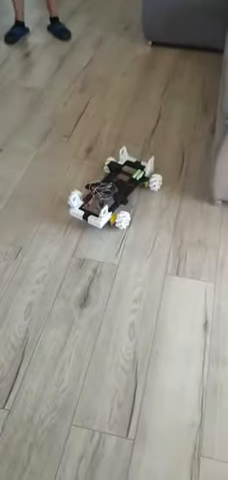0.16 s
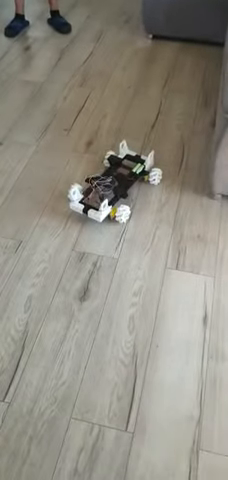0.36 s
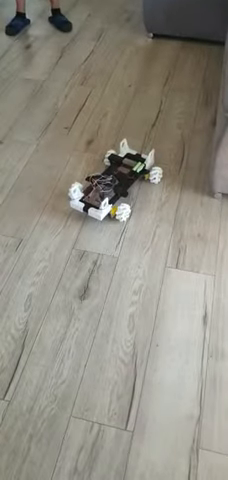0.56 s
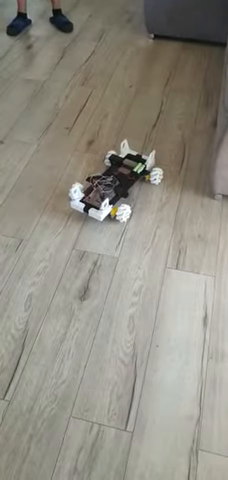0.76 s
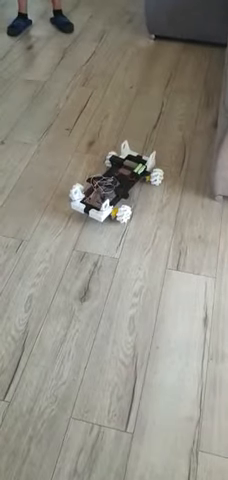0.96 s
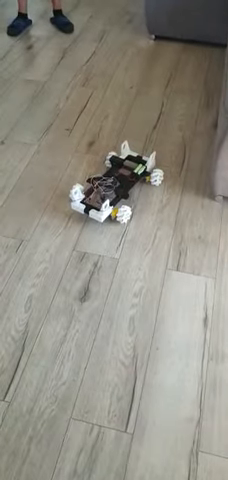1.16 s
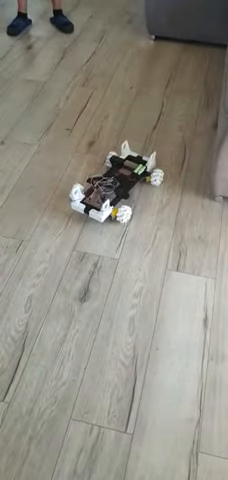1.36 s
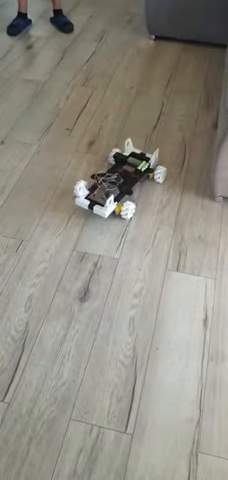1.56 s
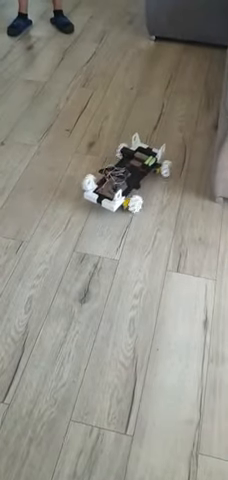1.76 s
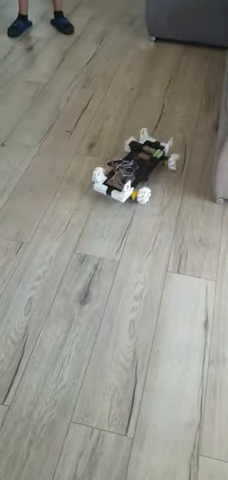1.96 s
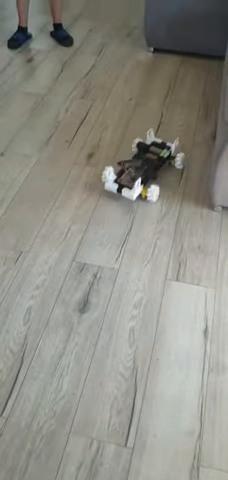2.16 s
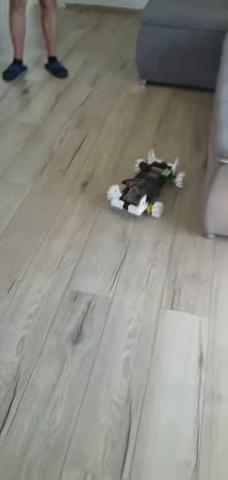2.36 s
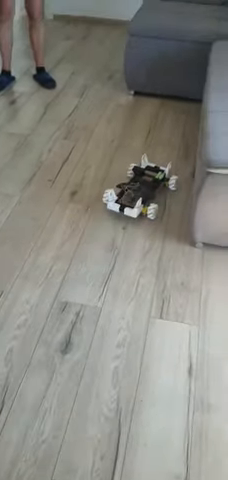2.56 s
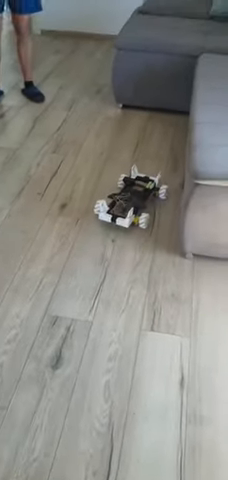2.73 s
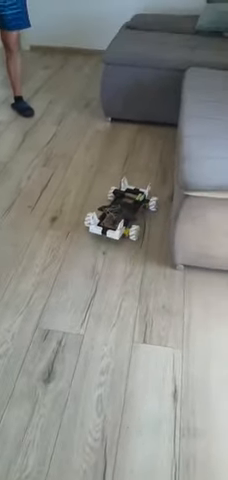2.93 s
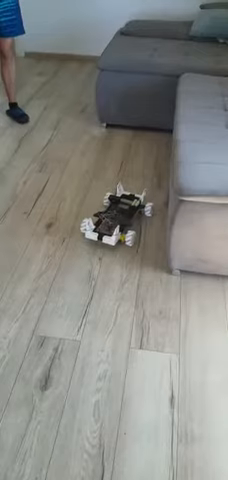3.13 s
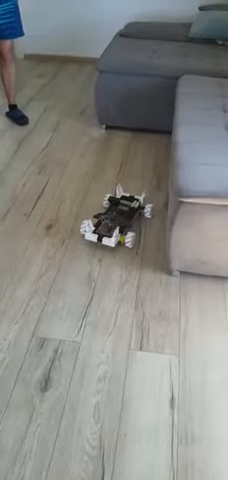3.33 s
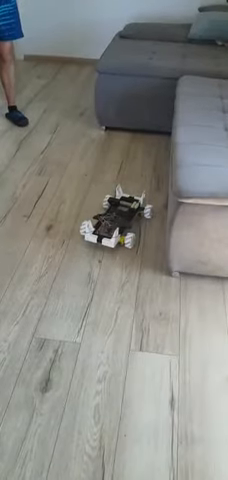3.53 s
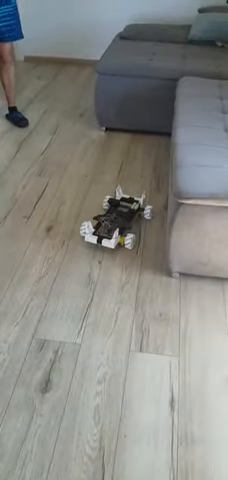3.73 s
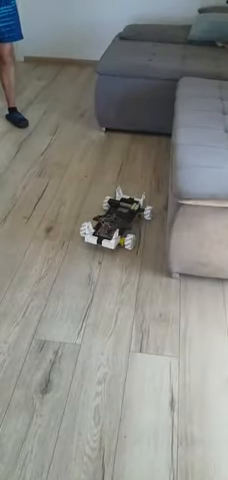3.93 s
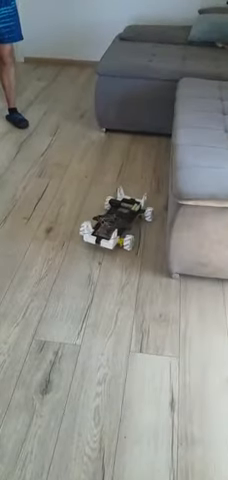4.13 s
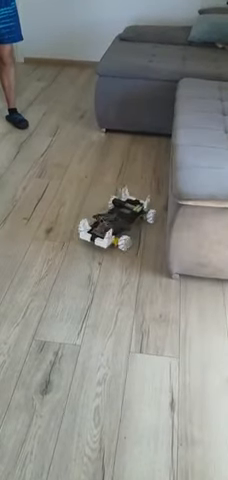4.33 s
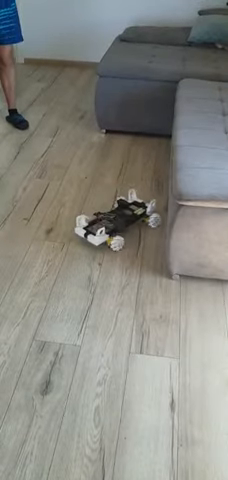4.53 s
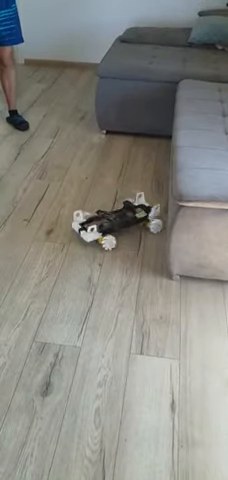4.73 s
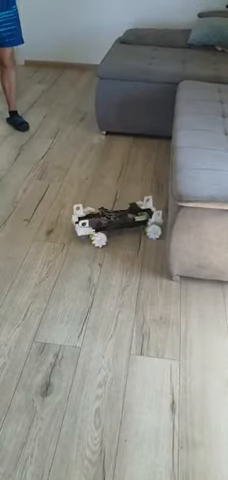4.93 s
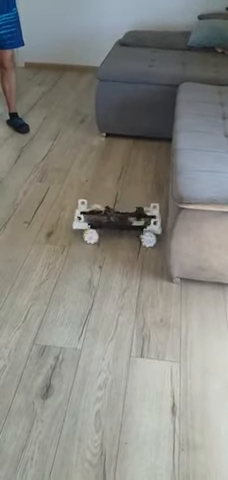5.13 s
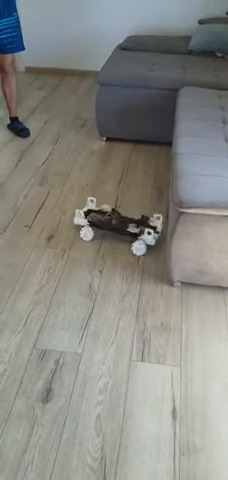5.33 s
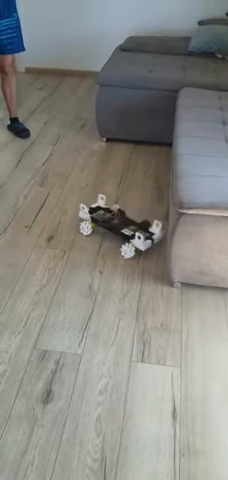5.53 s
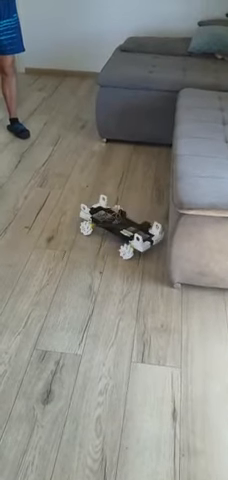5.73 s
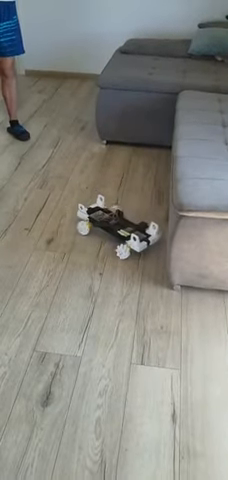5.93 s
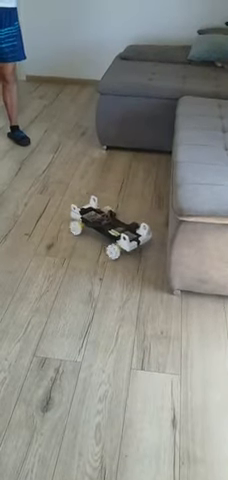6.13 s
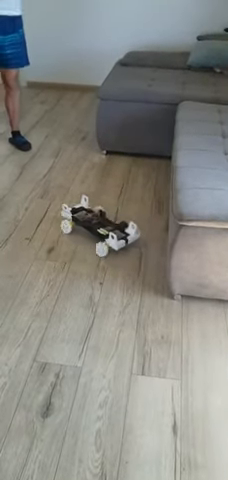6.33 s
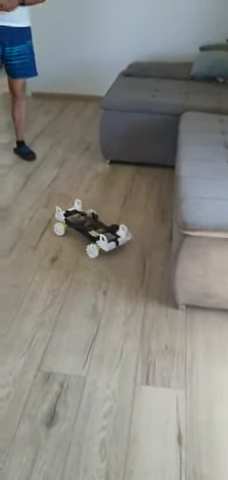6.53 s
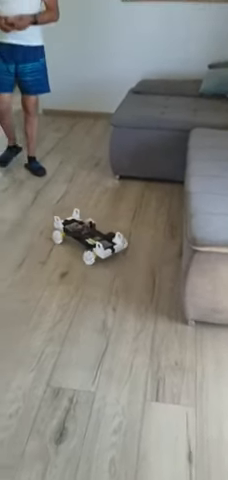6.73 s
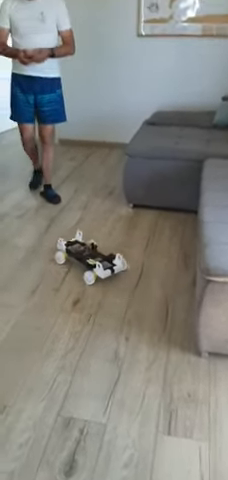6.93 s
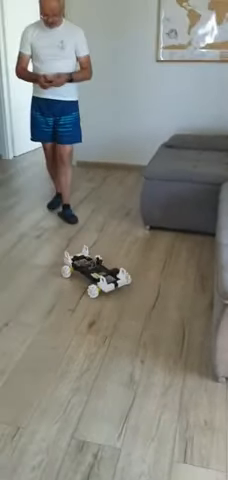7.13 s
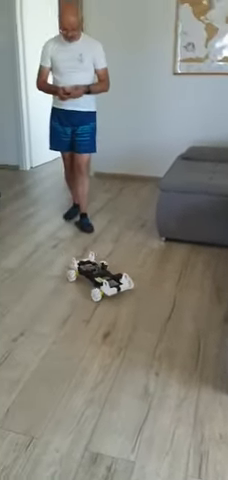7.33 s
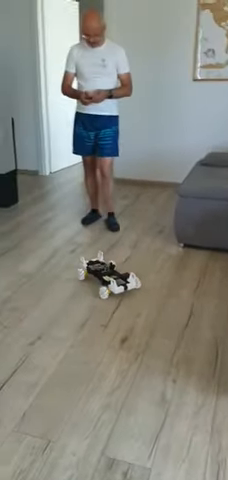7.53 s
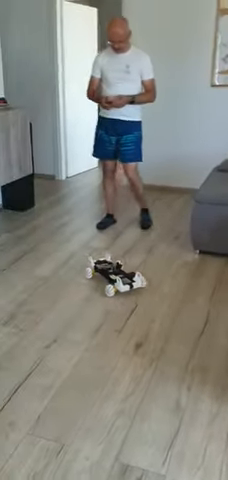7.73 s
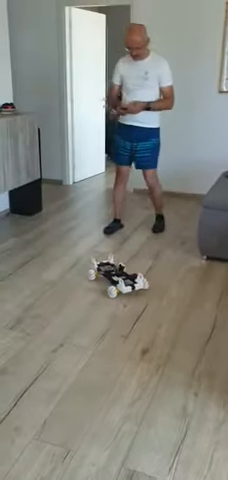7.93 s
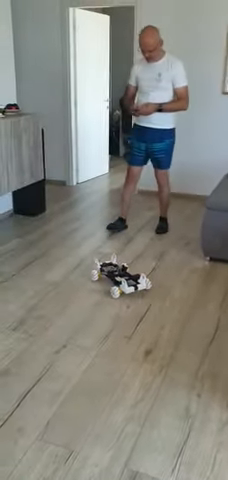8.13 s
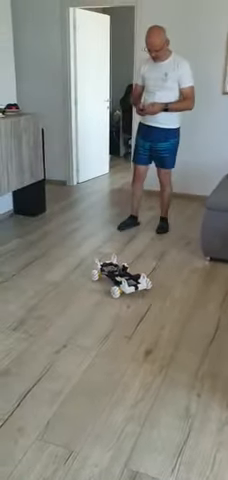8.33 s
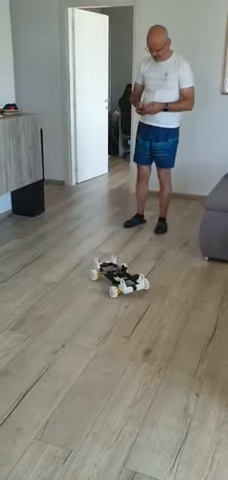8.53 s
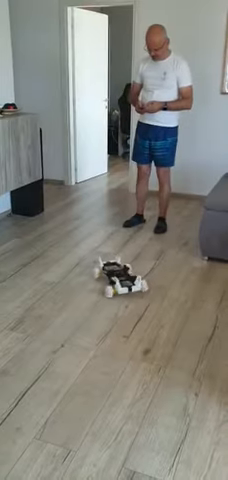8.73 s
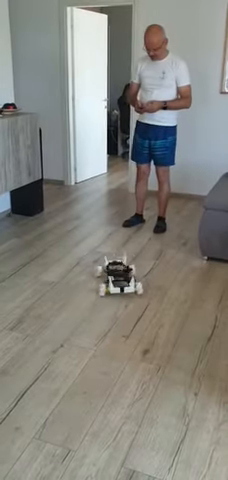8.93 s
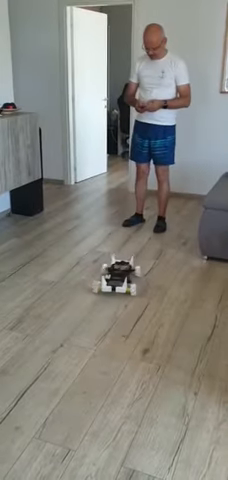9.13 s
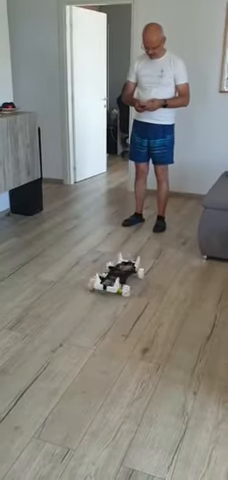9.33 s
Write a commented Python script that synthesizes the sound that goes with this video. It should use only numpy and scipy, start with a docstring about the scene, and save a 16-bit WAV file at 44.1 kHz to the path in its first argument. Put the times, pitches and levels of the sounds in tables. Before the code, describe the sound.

A small remote-controlled car drives across a laminate floor in a living room, in several short runs with brief pauses. Its electric motors whir and its plastic gears chatter brightly, while the wheels rattle, click and knock on the boards. Later the floor drums more hollowly beneath it. A slipper slides once before the last run. The car is heard from a couple of metres away, with clear room reflections and a faint low rumble.

```python
"""A small four-motor radio-controlled car drives, coasts and stops on a living room's laminate floor.
In each run the motors take up the gear play, spin up, hold speed and coast down. Tooth impacts make the
plastic gearboxes chatter, the motors whirr, and the wheels' rollers rattle on their pins and knock on
the boards, exciting the cavity below. A slipper slides once over the low rumble of the house.
At a couple of metres, much of the car's sound arrives by reflection from the walls."""
import sys
import numpy as np
from scipy import signal
from scipy.fft import rfft, irfft, next_fast_len
from scipy.io import wavfile
from scipy.ndimage import map_coordinates

SR = 44100
rng = np.random.default_rng(int(sys.argv[2]) if len(sys.argv) > 2 else 0)


def store_pcm(level_fs):
    """Save levels as 16-bit WAV."""
    pcm = np.round(np.clip(level_fs, -1, 1) * 32767).astype(np.int16)
    wavfile.write(sys.argv[1], SR, np.atleast_2d(pcm).T)


N = 418068

# Runs of the car: (power on [s], wheels roll [s], power off [s], standstill [s],
# creep relative to full drive [dB], full drive [dB], coasting loss [dB/s])
CAR_RUNS = [(-1, -.9, -.47, .08, -13, 0, 90), (1.345, 1.42, 2.325, 2.8, -12, -.6, 90),
            (4.02, 4.098, 5.43, 5.72, -12.5, .8, 118), (5.77, 5.83, 7.645, 8.07, -18, 2.3, 70),
            (8.44, 8.485, 9.5, 10, -22, .1, 90)]
# Brief swells and dips of the gear chatter and motor whirr:
# (start [s], duration [s], gain of gears and loose parts [dB], motor gain [dB])
SWELLS = [(-.15, .35, 9, -3), (1.86, .2, 5.5, 2), (2.68, .28, 10, 11), (4.3, .07, -3.5, -1),
          (4.38, .13, 1.5, 0), (4.78, .1, -3, 1.5), (5.13, .15, 1, 3.5), (5.55, .22, -2, -4.5),
          (5.88, .07, -5, -3), (5.96, .24, -4.5, -3), (6.22, .16, 2.5, 1), (6.43, .1, 2.5, 0),
          (6.54, .09, -3, -2), (7.0, .07, 1, 3.5), (7.155, .115, 4.5, 1), (7.64, .32, -4, 6.5),
          (7.95, .16, 3, 2), (8.43, .08, 0, 3), (8.99, .15, -6, -1)]
# Floor response along each run: (time [s], relative levels of patter [dB], drumming [dB], boom [dB])
FLOOR_RESPONSE = [
    [(1.4, -41, -51, -61), (1.95, -37.5, -47.5, -51), (2.1, -42.5, -52, -53), (2.3, -35.5, -52, -50),
     (2.5, -42, -54, -54)],
    [(4.04, -45, -56, -58), (4.15, -38.5, -50, -48), (4.45, -40, -48, -50), (5.0, -38, -50, -51),
     (5.18, -45, -53, -53), (5.35, -35, -44, -49), (5.65, -45, -55, -53)],
    [(6.05, -43, -53, -55), (6.33, -35.5, -50, -48), (6.5, -42, -48, -55), (6.95, -41, -45.5, -51),
     (7.2, -38, -36.5, -46), (7.45, -36, -35.5, -47), (7.65, -41, -38, -48), (7.9, -35.5, -38.5, -50)],
    [(8.55, -40, -43, -55), (8.75, -37.5, -40.5, -52), (9.0, -43, -40.5, -53), (9.2, -38, -41, -54),
     (9.48, -43, -42, -54)],
]
# A wheel drops from roller to roller in even trains:
# (start [s], level [dB], knocks [count], interval [s], change per knock [dB])
KNOCK_TRAINS = [(1.348, -58, 1, 0, 0), (1.442, -50.5, 2, .074, 4.5), (1.671, -46.5, 2, .024, 1),
                (1.851, -42, 1, 0, 0), (2.014, -48.5, 1, 0, 0), (2.153, -45, 2, .054, -4),
                (2.26, -45.5, 2, .055, .5), (4.109, -48, 5, .08, .5), (4.555, -52, 3, .053, 1.5),
                (4.867, -46.5, 2, .069, -1.5), (5.229, -48, 2, .024, 0), (5.864, -53, 2, .08, 6),
                (6.246, -44.5, 3, .054, -1), (6.623, -43, 4, .051, -2.5), (7.018, -45, 2, .053, -3),
                (8.496, -56, 1, 0, 0), (8.578, -47.5, 4, .079, 1.3), (8.917, -47.5, 4, .076, -.3),
                (9.269, -45, 1, 0, 0)]
# Gear play is taken up, or a loose roller snaps over: (time [s], level [dB])
PLASTIC_CLACKS = [(1.3488, -63), (1.4424, -51), (1.517, -41.5), (1.6708, -39), (1.7475, -48), (4.0228, -61),
                  (4.1066, -48.5), (4.203, -45), (4.4937, -42.5), (4.8717, -44), (4.9358, -44),
                  (5.0618, -37.5), (5.3645, -43), (5.4172, -45), (5.7693, -70), (5.8671, -48),
                  (5.945, -44.5), (6.2016, -44), (6.3036, -40), (6.4113, -44), (6.6252, -37.5),
                  (6.7713, -43), (7.1663, -38.5), (8.6573, -45.5), (8.9203, -41.5), (8.985, -46),
                  (9.22, -44)]
# Background of the house: (time [s], hiss level [dB], rumble level [dB])
HOUSE_LEVELS = [
    [(0, -67.5, -57), (1.3, -70.5, -58.5), (9.48, -73, -60)],
]
# Slide of the slipper: (time [s], level [dB])
SLIPPER_LEVELS = [
    [(8.0, -85), (8.14, -71), (8.22, -59.5), (8.31, -60), (8.335, -52.5), (8.46, -52.5), (8.52, -77)],
]

# Spectral envelopes of the sources: (frequency [Hz], relative level [dB])
GEARBOX_SPECTRUM = [(300, -44), (1200, -21.5), (2000, -13), (2900, -10), (4000, -7), (5350, -3.5),
                    (5800, 4), (6200, -2.5), (6700, -2.5), (7400, -6.5), (9500, -11.5), (11000, -16),
                    (12000, -14.5), (14000, -17.5), (15500, -42)]
MOTOR_SPECTRUM = [(150, -41.5), (700, -30), (1250, -15), (2000, -5.5), (2400, -3.5), (2750, 1),
                  (3100, -1.5), (3700, -7), (5000, -12.5), (5900, -4), (7000, -12.5), (9000, -29.5),
                  (15000, -45)]
PLASTIC_SPECTRUM = [(300, -40), (1200, -10.5), (2500, -3.5), (4000, -4), (5200, -4), (6200, 3),
                    (7400, -2.5), (10000, -11.5), (14000, -17), (15500, -33.5)]
BOARD_SPECTRUM = [(60, -41), (180, -21.5), (300, -20), (420, -9.5), (640, 1.5), (880, -1), (1200, -14),
                  (1800, -14), (4000, -32.5), (12000, -52)]
CAVITY_SPECTRUM = [(100, -41), (250, -16), (330, -8.5), (420, 0.5), (540, -6), (900, -37), (3000, -60.5)]
BOOM_SPECTRUM = [(50, -22.5), (120, -7.5), (195, 1), (270, -1.5), (400, -16.5), (1500, -54.5)]
RUMBLE_SPECTRUM = [(15, -36.5), (28, -18.5), (45, 0), (62, -3.5), (80, -3), (100, 0), (130, -6),
                   (180, -12.5), (260, -19.5), (500, -35), (2000, -79.5)]
HISS_SPECTRUM = [(40, -16.5), (250, 0.5), (420, -2.5), (700, -0.5), (920, -0.5), (1000, 2), (1100, -1),
                 (1400, -4.5), (2500, -16.5), (6000, -23.5), (8500, -30.5), (11500, -22), (14500, -22.5),
                 (15500, -33)]
ROLLER_SPECTRUM = [(60, -38.5), (200, -21), (400, -6), (650, 1), (900, -2.5), (1250, -10), (1800, -13),
                   (4000, -17), (12000, -49)]
SOLE_SPECTRUM = [(200, -6), (500, -6), (800, 2), (1100, -4), (2500, 1.5), (5500, -2), (8500, -4),
                 (13000, -9.5), (15500, -13.5)]

# Reverberation of the room: (frequency [Hz], time to decay by 60 dB [s])
ROOM_T60 = [(100, 0.82), (500, 0.66), (2500, .62), (6000, 0.4), (9000, .34), (14000, .22)]
# Similarity of the diffuse field at left and right: (frequency [Hz], coherence [ratio])
COHERENCE = [(100, 0.94), (290, 1), (640, 0.18), (1400, 0.13), (15000, 0.076)]
# Imbalance of the two microphone ports: (frequency [Hz], left minus right [dB])
PORT_BALANCE = [(100, 4.5), (200, 5.5), (380, 0), (700, 6.5), (1300, 1), (2400, 1.5), (15000, 1)]

TOP_HZ = 15700  # upper band limit
TIME = np.arange(N) / SR


def amp(db):
    """Amplitude ratio of a level in decibels."""
    return 10 ** (np.asarray(db) / 20)


def unit_rms(x):
    """Normalisation to unit mean power."""
    return x / np.sqrt(np.mean(x ** 2) + 1e-20)


def decay(t, t60):
    """Exponential damping by 60 dB in t60 seconds."""
    return np.exp(-np.log(1000) * t / t60)


def at_frequency(points, hz):
    """Interpolation of (frequency, value) points on a logarithmic frequency axis."""
    knots_hz, values = np.transpose(points)
    return np.interp(np.log(hz + 1), np.log(knots_hz + 1), values)


def envelope(tables, column):
    """Amplitude envelope interpolated in decibels, silent outside each table's span."""
    return sum(amp(np.interp(TIME, rows[:, 0], rows[:, column], -np.inf, -np.inf))
               for rows in map(np.array, tables))


def wobble(knots_per_s):
    """Smooth random modulation: a spline through Gaussian values."""
    return map_coordinates(rng.standard_normal(4096), [TIME * knots_per_s], mode="wrap")


def coloured(x, spectrum):
    """Minimum-phase filtering: folding the cepstrum gives a causal response with this spectrum."""
    size = 2 * next_fast_len(N // 2 + SR // 4)
    gain = amp(at_frequency(spectrum, np.fft.rfftfreq(size, 1 / SR)))
    cepstrum = irfft(np.log(gain))
    cepstrum[1:size // 2] *= 2
    cepstrum[size // 2 + 1:] = 0
    return irfft(rfft(x, size) * np.exp(rfft(cepstrum)), size)[..., :N]


def diffuse(size):
    """Stereo noise of a diffuse field: coherent in the bass, nearly independent in the treble."""
    coherence = at_frequency(COHERENCE, np.fft.rfftfreq(size, 1 / SR))
    angle = np.arccos(np.clip(coherence, -1, 1)) / 2
    white = rfft(rng.standard_normal((2, size)))
    mid, side = irfft(white * [np.cos(angle), np.sin(angle)], size)
    return np.array([mid + side, mid - side])


def impacts(rate_hz, jitter, spread_db):
    """Quasi-periodic impulses of uneven size; jitter is a fraction of the period."""
    at = np.flatnonzero(np.diff(np.floor(np.cumsum(rate_hz) / SR)))
    late, size = rng.standard_normal((len(at), 2)).T
    at = np.clip(at + jitter * late * SR / rate_hz[at], 0, N - 1).astype(int)
    return np.bincount(at, amp(spread_db * np.clip(size, -2, 2)), N)


def scattered(impulses, t60, grind_db):
    """Scattering by floor and furniture smears each impulse into a noise burst, over a steady grind."""
    power = signal.lfilter([1], [1, -decay(1 / SR, t60) ** 2], impulses ** 2)
    return unit_rms(np.sqrt(power / power.mean() + amp(grind_db) ** 2) * diffuse(N))


def car_drive(switch_s=.015, spin_up_s=.068, halt_s=.04):
    """First-order lags: the car creeps, spins up to a drive of about 1, coasts and halts."""
    since = lambda s: np.maximum(TIME - s, 0)
    drive = np.zeros(N)
    for on, roll, off, rest, creep_db, full_db, loss_db_per_s in CAR_RUNS:
        switched = 1 - np.exp(-since(on) / switch_s)
        spun_up = 1 - (1 - amp(creep_db)) * np.exp(-since(roll) / spin_up_s)
        hold_and_coast = amp(full_db - loss_db_per_s * since(off))
        drive += switched * spun_up * hold_and_coast * np.exp(-since(rest) / halt_s)
    return drive


def swell_gain(column, judder_db=.6):
    """Amplitude modulation: brief swells and dips, and a random judder as the rollers grip and slip."""
    arches_db = sum(row[column] * np.sin(np.pi * np.clip((TIME - row[0]) / row[1], 0, 1))
                    for row in SWELLS)
    return amp(arches_db + judder_db * wobble(22))


def jolt_gain(drops, surge_db=1.1, peak_s=.016):
    """Transient modulation: each roller drop jolts the gears into a brief surge."""
    impulses = np.bincount([round(s * SR) for s, db in drops], minlength=N)[:N]
    age = np.arange(SR // 4) / SR / peak_s
    return amp(surge_db * signal.fftconvolve(impulses, age * np.exp(1 - age))[:N])


def gear_chatter(drive, tooth_hz=190, flutter_db=.8, dull_hz=7200):
    """Tooth impacts in four unsynchronised gearboxes: faster, louder and brighter under drive."""
    speed = np.clip(drive / drive.max(), .01, 1) ** .2
    teeth = sum(impacts(tooth_hz * speed * amp(1.2 * wobble(7)), jitter=.2, spread_db=3)
                * amp(2.04 * wobble(25)) for gearbox in range(4))
    bright = coloured(scattered(teeth / np.sqrt(speed), t60=.006, grind_db=-1), GEARBOX_SPECTRUM)
    dull = signal.sosfiltfilt(signal.butter(3, dull_hz, fs=SR, output="sos"), bright)
    hardness = np.minimum(1.2 * speed, 1) ** 2
    chatter = dull + hardness * (bright - dull)
    return drive * unit_rms(chatter * amp(flutter_db * wobble(60)))


def motor_whirr(gain, shaft_hz=130):
    """Quasi-periodic excitation: the ticks of brushes and shafts in four motors fuse into a whirr."""
    ticks = sum(impacts(shaft_hz * amp(wobble(4)), jitter=.1, spread_db=1.5) for motor in range(4))
    return gain * unit_rms(coloured(scattered(ticks, t60=.0075, grind_db=0), MOTOR_SPECTRUM))


def loose_parts(drive, per_second=380, pitch_hz=4600, log_spread=.36, ring_t60=.028, spread_db=3):
    """Damped free vibration: loose rollers and chassis parts tick, each ringing at its own pitch."""
    t = np.arange(SR // 40) / SR
    when, pitch, size, life, left, right = rng.random((round(per_second * N / SR), 6)).T[:, :, None]
    centred = lambda uniform: np.sqrt(3) * (2 * uniform - 1)  # zero mean, unit variance
    hz = np.minimum(pitch_hz * np.exp(log_spread * centred(pitch)), TOP_HZ)
    fade = amp(spread_db * centred(size)) * decay(t, ring_t60 * (.5 + life))
    at = ((when * N).astype(int) + np.arange(len(t))).ravel()
    # Different paths give each tick a different phase at left and right.
    rings = (fade * np.sin(2 * np.pi * (hz * t + phase)) for phase in (left, right))
    ticks = np.array([np.bincount(at, ring.ravel(), N)[:N] for ring in rings])
    return drive * unit_rms(coloured(ticks, PLASTIC_SPECTRUM))


def rolling(gain, spectrum, bump_hz, spread_db, grind_db):
    """Forced vibration of the floor: the rollers of four wheels patter over a steady grind."""
    bumps = sum(impacts(bump_hz * amp(2 * wobble(4)), jitter=.3, spread_db=spread_db)
                for wheel in range(4))
    return gain * unit_rms(coloured(scattered(bumps, t60=.025, grind_db=grind_db), spectrum))


def reverberation(x, build_up_s=.0066):
    """Wall reflections die fastest in the treble; paths change as the car moves, so tails are redrawn."""
    size, hop = 2 ** 15, 2 ** 13
    onset = 1 - np.exp(-np.arange(size) / SR / build_up_s)
    window = np.sqrt(signal.get_window("hann", 2 * hop))
    x = np.pad(x, [(0, 0), (hop, 2 * hop)])
    out = np.zeros((2, N + 2 * size))
    for start in range(0, N + hop, hop):
        hz, age, bands = signal.stft(diffuse(size), SR, nperseg=256)
        bands *= decay(age, at_frequency(ROOM_T60, hz)[:, None])
        tail = signal.istft(bands, SR, nperseg=256)[1][:, :size]
        tail = unit_rms(tail * onset) / np.sqrt(size)
        heard = signal.fftconvolve(x[:, start:start + 2 * hop] * window, tail, axes=1)
        out[:, start:start + heard.shape[1]] += heard
    return out[:, hop:hop + N]


def house_noise(swell_db=.4):
    """Diffuse background noise: a gently wavering rumble and a faint hiss."""
    rumble = unit_rms(coloured(diffuse(N), RUMBLE_SPECTRUM) * amp(swell_db * wobble(6)))
    hiss = unit_rms(coloured(diffuse(N), HISS_SPECTRUM))
    return envelope(HOUSE_LEVELS, column=2) * rumble + envelope(HOUSE_LEVELS, column=1) * hiss


def blows(events, spectrum, crack_t60, rattle_t60, rattle_db):
    """Impact excitation: a short crack and a dying rattle, filtered by the struck part's response."""
    t = np.arange(SR // 3) / SR
    body = coloured(signal.unit_impulse(N), spectrum)[None, :len(t) // 8]
    burst = lambda t60: unit_rms(signal.fftconvolve(diffuse(len(t)) * decay(t, t60), body)[:, :len(t)])
    out = np.zeros((2, N + SR))
    for s, db in events:
        at = round(s * SR)
        out[:, at:at + len(t)] += amp(db) * (burst(crack_t60) + amp(rattle_db) * burst(rattle_t60))
    return out[:, :N]


def slipper_slide():
    """Sliding friction of a sole on the floor radiates broadband noise."""
    return envelope(SLIPPER_LEVELS, column=1) * unit_rms(coloured(diffuse(N), SOLE_SPECTRUM))


def scene():
    """Superposition of the car's direct sound, its reverberation, the house and the slipper."""
    drops = [(s + k * gap, db + k * step_db)
             for s, db, count, gap, step_db in KNOCK_TRAINS for k in range(round(count))]
    floor = np.vstack(FLOOR_RESPONSE)
    board_gain, cavity_gain, boom_gain = (amp(np.interp(TIME, floor[:, 0], db)) for db in floor.T[1:])
    drive = car_drive()
    gear_drive = drive * swell_gain(column=2) * jolt_gain(drops)
    spinning, turning = drive ** .78, drive ** .8  # powers below 1: motors and wheels outlast the gears
    gears = amp(-30.5) * gear_chatter(gear_drive)
    motors = amp(-37.7) * motor_whirr(spinning * swell_gain(column=3))
    ticks = amp(-35.7) * loose_parts(gear_drive)
    patter = rolling(turning * board_gain, BOARD_SPECTRUM, bump_hz=30, spread_db=2.5, grind_db=-3)
    drumming = rolling(turning * cavity_gain, CAVITY_SPECTRUM, bump_hz=20, spread_db=2.5, grind_db=-.5)
    boom = rolling(turning * boom_gain, BOOM_SPECTRUM, bump_hz=20, spread_db=1, grind_db=0)
    running = gears + motors + ticks + amp(-3) * patter + amp(-3.6) * drumming + amp(-3.2) * boom
    knocks = blows(drops, ROLLER_SPECTRUM, crack_t60=.05, rattle_t60=.135, rattle_db=-5.5)
    thuds = blows(drops, CAVITY_SPECTRUM, crack_t60=.07, rattle_t60=.13, rattle_db=-6)
    thuds *= amp(-4) * cavity_gain / board_gain  # the cavity answers most where the boards drum
    clacks = blows(PLASTIC_CLACKS, PLASTIC_SPECTRUM, crack_t60=.036, rattle_t60=.11, rattle_db=-4)
    hits = knocks + thuds + clacks
    slipper = slipper_slide()
    reflections = reverberation(amp(-7.5) * running + amp(-4) * hits)
    return running + hits + reflections + house_noise() + slipper


def record(dry, notch_hz=8050, half_width_hz=300, notch_db=-12):
    """Frequency response of two microphone ports: unequal colour, a shared notch and a band limit."""
    hz = np.fft.rfftfreq(2 * N, 1 / SR)
    balance_db = np.outer([1, -1], at_frequency(PORT_BALANCE, hz)) / 2
    dip_db = notch_db / (1 + ((hz - notch_hz) / half_width_hz) ** 2)
    return irfft(rfft(dry, 2 * N) * amp(balance_db + dip_db) * (hz < TOP_HZ))[:, :N]


dry = scene()
out = record(dry)
store_pcm(out)
```